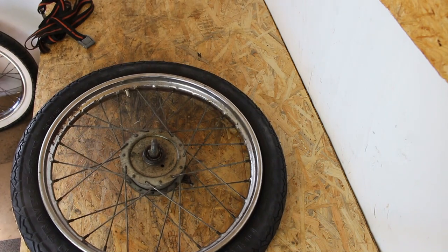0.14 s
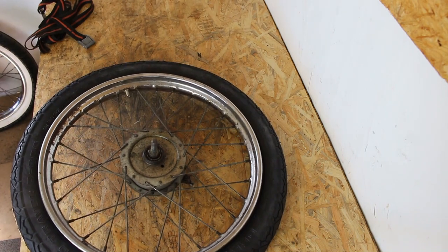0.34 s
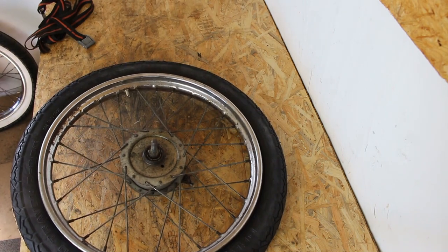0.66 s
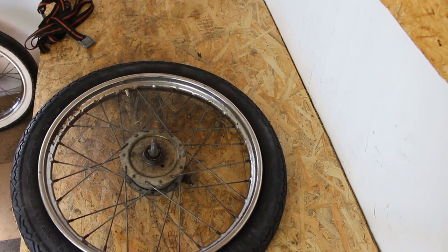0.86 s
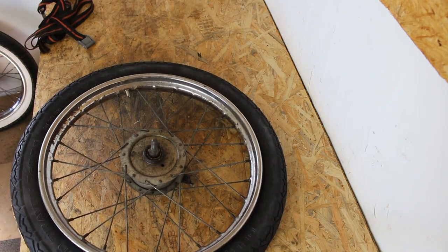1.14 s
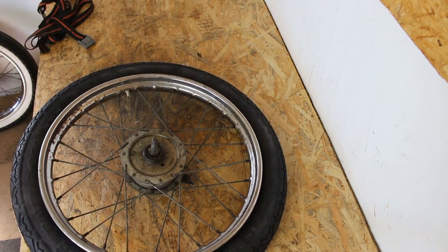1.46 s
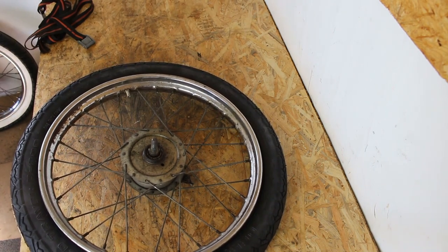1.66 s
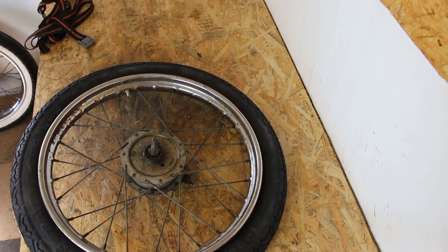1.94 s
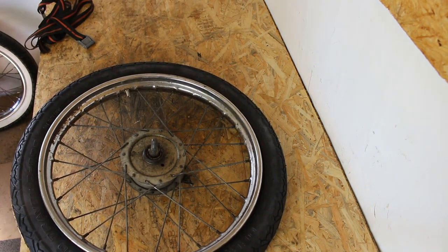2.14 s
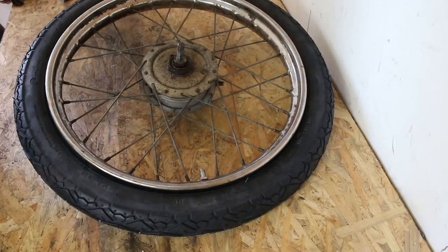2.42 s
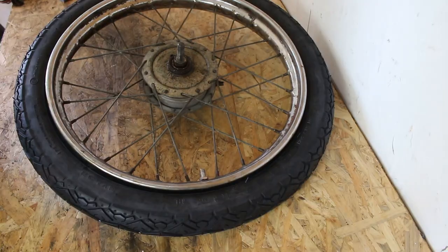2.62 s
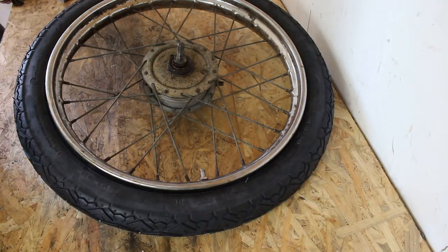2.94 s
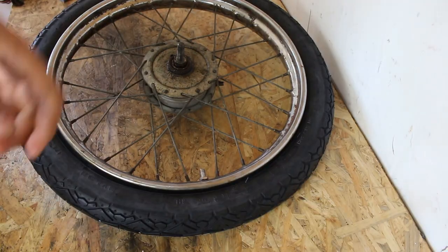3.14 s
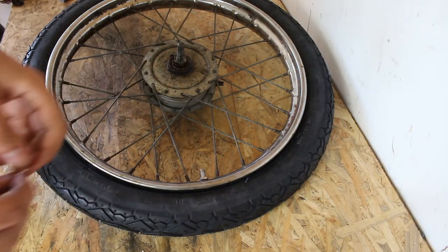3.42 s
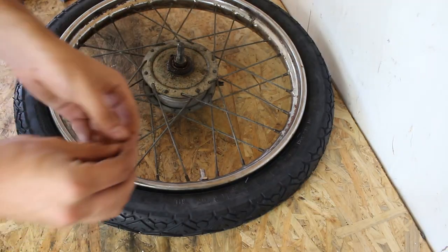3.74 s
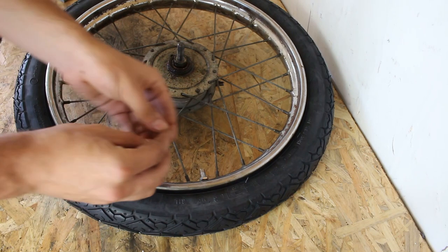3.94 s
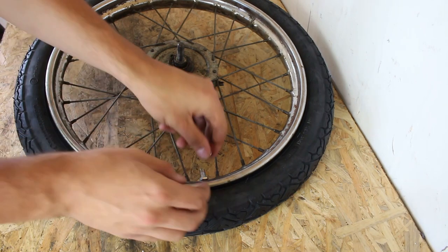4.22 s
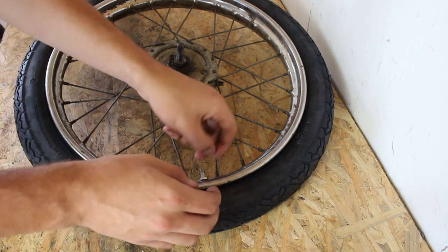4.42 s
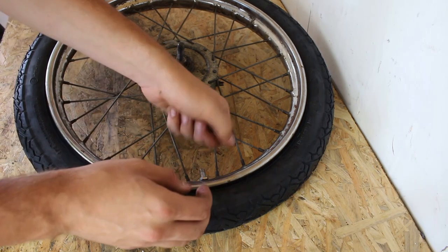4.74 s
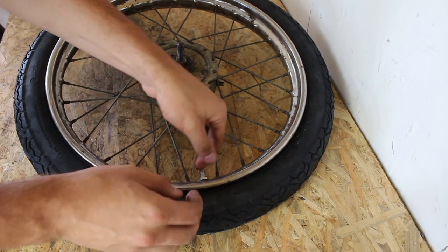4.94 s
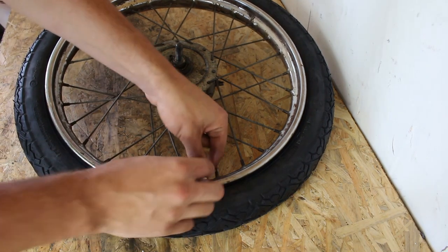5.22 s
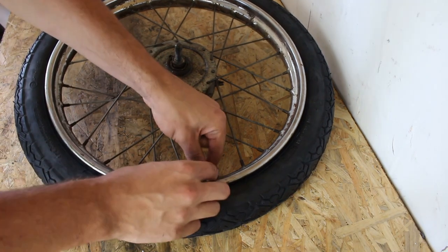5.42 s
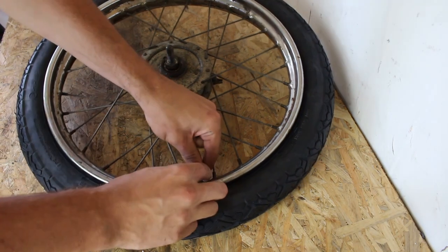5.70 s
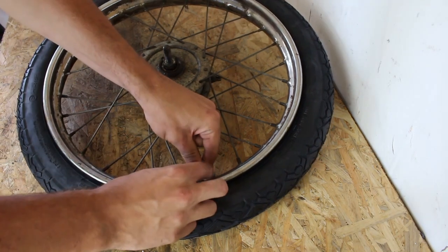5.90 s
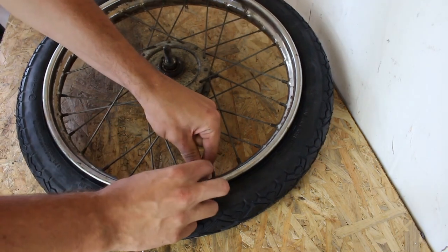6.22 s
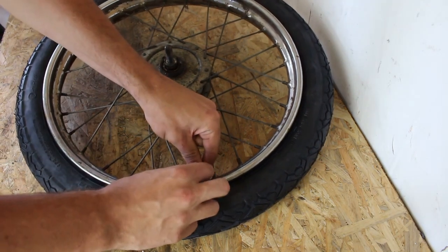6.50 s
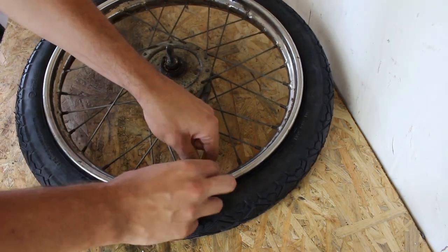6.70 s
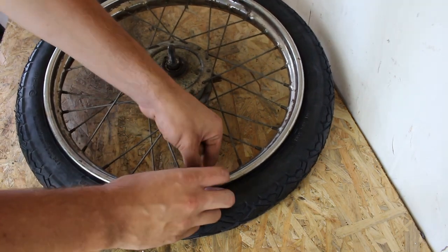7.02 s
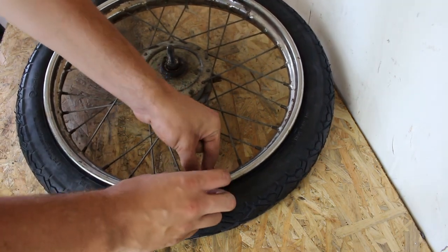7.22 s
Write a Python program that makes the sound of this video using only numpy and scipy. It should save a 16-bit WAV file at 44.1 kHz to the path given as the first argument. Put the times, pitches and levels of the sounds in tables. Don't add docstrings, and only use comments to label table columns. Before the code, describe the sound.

Loud bursts of clashing steel bars in a small workshop, followed by dull room knocks and faint handling of a wheel over soft hiss.

```python
import sys
import numpy as np
from scipy import signal
from scipy.fft import rfft, irfft, next_fast_len
from scipy.io import wavfile
from scipy.ndimage import uniform_filter1d

SR = 44100
rng = np.random.default_rng(int(sys.argv[2]) if len(sys.argv) > 2 else 0)


def put_to_file(sound):
    columns = np.atleast_2d(sound).T
    safe = np.clip(columns, -1, 1)
    whole_steps = np.round(safe * 32767)
    wavfile.write(sys.argv[1], SR, whole_steps.astype(np.int16))


def boost(x):
    u = np.asarray(x, float) / 20
    return 10 ** u


N = 324576


def read(table, hz):
    f, v = np.transpose(table)
    return np.interp(np.log(hz + 1), np.log(f), v)


def shape(x, gain):
    size = next_fast_len(x.shape[-1] + SR // 4)
    hz = np.arange(size // 2 + 1) * SR / size
    return irfft(rfft(x, size) * gain(hz), size)[..., :x.shape[-1]]


def below(hz, edge_hz, order):
    return 1 / (1 + (hz / edge_hz) ** order)


def above(hz, edge_hz, order):
    return 1 / (1 + (edge_hz / (hz + 1)) ** order)


def octave(hz, centre_hz):
    return np.clip(1 - abs(np.log2((hz + 1) / centre_hz)), 0, 1)


def fade(length, t60_s):
    return np.exp(-np.log(1000) * np.arange(length) / SR / np.clip(t60_s, .002, 3))


def ring(x, modes, longest_s=3.1):
    out = 0
    for hz, db, t60_s in modes:
        r = np.exp(-np.log(1000) / (np.clip(t60_s, .01, longest_s) * SR))
        w = 2 * np.pi * hz / SR
        out = out + boost(db) * signal.lfilter([np.sin(w)], [1, -2 * r * np.cos(w), r * r], x)
    return out


def lasting(rows, t60_s):
    return [(*row, t60_s) for row in rows]


def contacts(rows, grain_db, length=N, rise_s=0.0017):
    out = np.zeros(length + SR // 2)
    span = SR // 3
    rise = 1 - np.exp(-np.arange(span) / SR / rise_s)
    for s, db, t60_s in rows:
        unevenness = np.minimum(rng.exponential(size=span), 6)
        grains = rng.standard_normal(span) * boost(grain_db * unevenness)
        out[int(s * SR):][:span] += boost(db) * rise * fade(span, t60_s) * grains / grains.std()
    return out[:length]


def pings(rows, push_cycles):
    out = np.zeros(N + SR)
    t = np.arange(SR // 2) / SR
    for s, db, hz, t60_s in rows:
        build = 1 - np.exp(-t * hz / push_cycles)
        swing = np.sin(2 * np.pi * hz * t) * build * fade(len(t), t60_s)
        out[int(s * SR):][:len(t)] += boost(db) * swing / abs(swing).max()
    return out[:N]


def strike(blows, modes):
    return pings([(s, db + g, hz, t60_s) for s, db in blows for hz, g, t60_s in modes], 0.94)


def ports(three, alike):
    def likeness(hz):
        return np.clip(read(alike, hz), -1, 1)

    sides = []
    for k in range(2):
        shared = shape(three[0], lambda hz: np.sqrt(abs(likeness(hz))) * np.sign(likeness(hz)) ** k)
        own = shape(three[1 + k], lambda hz: np.sqrt(1 - abs(likeness(hz))))
        sides.append(shared + own)
    return np.array(sides)


# f/Hz, phase/rad
PORT_TURN = [(60, 0), (3000, .1), (5500, .4), (7500, 1.6), (9500, 2.3), (16000, 2.4)]


def direct_pair(x):
    return np.array([shape(x, lambda hz: np.exp(.5j * side * read(PORT_TURN, hz))) for side in (1, -1)])


# f/Hz, t60/s
ROOM_T60 = [(60, 0.35), (250, .35), (1000, 0.34), (3000, 0.29), (7000, 0.29), (15000, 0.18)]
# f/Hz, likeness/-1..1
PORT_ALIKE = [(60, .9), (130, .96), (450, .82), (1400, .5), (3100, .42), (6000, .2), (9000, -.4),
              (15000, -.6)]


def workshop(x, direct_db, build_s=0.0033):
    length, lead, tail = SR // 2, 256, 0
    noise = rng.standard_normal((3, length))
    for hz in 45.4 * 2. ** np.arange(9):
        band = shape(noise, lambda f: octave(f, hz))
        tail = tail + band * fade(length, read(ROOM_T60, hz))
    tail = tail * (1 - np.exp(-np.arange(length) / SR / build_s))
    tail = tail / np.sqrt(np.mean(np.sum(tail ** 2, axis=1)))
    response = ports(np.pad(tail, ((0, 0), (lead, 0))), PORT_ALIKE)
    click = boost(direct_db) * (np.arange(response.shape[1]) == lead)
    response = response + direct_pair(click)
    return signal.fftconvolve(x[None], response, axes=1)[:, lead:lead + len(x)]


def moving(x, direct_db, move_s, count=3):
    t = np.arange(len(x)) / SR
    out = 0
    for k in range(count):
        share = np.sqrt(2 / count) * np.cos(np.pi * (t / move_s + k / count))
        out = out + workshop(x * share, direct_db)
    return out


def diffuse(x, direct_db, build_s=0.002):
    def lag(power, r):
        return signal.lfilter([1 - r], [1, -r], power)

    noise, wash = rng.standard_normal((3, len(x))), 0
    for hz in 49.5 * 2. ** np.arange(9):
        power = shape(x, lambda f: octave(f, hz)) ** 2
        power = lag(power, np.exp(-1 / (build_s * SR)))
        power = lag(power, 10 ** (-6 / (read(ROOM_T60, hz) * SR)))
        band = shape(noise, lambda f: octave(f, hz))
        wash = wash + band / band.std() * np.sqrt(power)
    return ports(wash, PORT_ALIKE) + boost(direct_db) * direct_pair(x)


# f/Hz, density/dB per Hz
HISS = [(30, -14.5), (91, -3.5), (140, -7), (654, -11), (1430, -13.5), (4950, -20.5), (10000, -28),
        (15800, -38)]
# f/Hz, likeness/-1..1
HISS_ALIKE = [(60, 1), (130, -0.17), (290, -0.47), (640, -0.56), (1410, -0.51), (3100, -0.36), (6820, 0.43),
              (15000, 1)]


def hiss():
    air = ports(shape(rng.standard_normal((3, N)), lambda hz: boost(read(HISS, hz))), HISS_ALIKE)
    steps = np.repeat(rng.standard_normal(N // 4096 + 1), 4096)
    sway_db = .5 * uniform_filter1d(steps, 4096)[:N]
    return air * boost(-58.6 + sway_db) / air.mean(axis=0).std()


# f/Hz, density/dB per Hz
WOOD = [(120, -35), (232, -1), (290, -6.5), (647, -3), (2170, -5), (3190, -5), (8740, -24), (16000, -44)]


def wood(rows, rise_s):
    split_hz, top_hz = 2700, 7500
    s, db, treble_db, t60_s = np.transpose(rows)

    def part(level_db, grain_db, band):
        burst = contacts(zip(s, level_db, t60_s), grain_db, rise_s=rise_s)
        return shape(burst, lambda hz: boost(read(WOOD, hz)) * band(hz))

    body = part(db, 3.8, lambda hz: below(hz, split_hz, 4))
    hard = part(db + treble_db + 6.5, 1.9, lambda hz: below(hz, top_hz, 4) - below(hz, split_hz, 4))
    top = part(db + 2.07 * treble_db + 14.5, 2.2, lambda hz: 1 - below(hz, top_hz, 4))
    return body + hard + top


# t/s, peak level/dB, treble/dB, contact t60/s
KNOCKS = [(0.01, -4.5, -1, 0.041), (2.026, -34.5, -7, 0.098), (2.066, -22, -36, 0.047),
          (2.158, -22.5, -22, 0.063), (2.21, -34.5, -8, 0.097), (2.238, -24, -5, 0.077),
          (2.357, -12.5, -1, 0.033), (2.372, -19, -5.5, 0.097), (3.034, -13, -9, 0.068),
          (3.059, -13, -8.5, 0.052), (3.11, -28.5, -7.5, 0.053), (3.128, -14.5, -3.5, 0.024),
          (3.276, -10.5, -2.5, 0.038), (3.294, -5.5, -5.5, 0.029), (3.537, -26.5, -27, 0.027),
          (3.559, -18.5, -12.5, 0.057), (3.6, -21.5, -9.5, 0.064), (3.622, -22.5, -9.5, 0.061),
          (3.729, -17.5, -8.5, 0.094), (3.745, -19, -9, 0.046), (3.77, -23.5, -12, 0.04)]


def knocks():
    length = int(4.4 * SR)
    dry_knocks = boost(12.0) * wood(KNOCKS, rise_s=0.0012)[:length]
    return np.pad(diffuse(dry_knocks, -6), ((0, 0), (0, N - length)))


# f/Hz, level/dB, t60/s
DROP = [(738, -5.5, 0.16), (1153, -7.5, 0.11), (1330, 4.5, 0.018), (1817, -1.5, 0.074), (2320, 1, 0.025),
        (3961, -14, 0.086), (7424, -22.5, 0.4), (9340, -16, 0.1)]


def tool_drop():
    return strike([(.0108, -13)], DROP)


# t/s, peak level/dB, rattle t60/s
CLASH_0 = [
    (0.0138, -4.5, 0.029),
    (.05, -21.5, 0.28),
]
CLASH_A = [
    (0.229, -11, 0.088),
    (0.2456, -6, 0.048),
    (0.2999, -14.5, 0.075),
]
CLASH_B = [(0.361, -5.5, 0.069), (0.366, 4.5, 0.022), (0.3807, -11, 0.029), (0.4284, -4.5, 0.042),
           (0.456, -4, 0.032), (0.5013, -23, 0.29), (.555, -16, 0.17), (0.5719, -11, 0.085),
           (0.5874, -11, 0.089), (.62, -18.5, 0.036), (0.6493, -7.5, 0.041)]
CLASH_C = [
    (0.862, -28.5, 0.089),
    (0.878, -12.5, 0.042),
    (0.8895, -6, 0.059),
    (0.92, -8, 0.057),
    (.945, -15.5, 0.083),
    (0.968, -17, 0.11),
    (1.02, -18.5, 0.13),
    (1.095, -19.5, 0.065),
]
# f/Hz, level/dB, t60/s
LEVER_0 = [(4020, -12, .25), (4680, -17, .2), (5750, -14, .1), (6320, -15, .25), (7420, -13, .3),
           (9240, -21, .1), (11100, -27, .2), (11700, -34, .15)]
LEVER_A = [(3290, -9, .12), (3700, -7, .27), (4060, -10, .2), (4530, -4, .27), (4800, -9, .2),
           (5270, -10, .27), (6150, -6, .15), (6300, -6, .15), (7500, -12, .15), (7890, -13, .15),
           (8900, -17, .1), (10330, -23, .2), (11100, -26, .15), (12000, -35, .2), (8500, -20, .1),
           (9300, -17, .1), (10000, -27, .1), (10650, -26, .1), (11750, -30, .12), (12500, -36, .2)]
LEVER_B = [(2295, -16, .2), (3145, -5, .22), (4062, -1, .22), (5061, -10, .15), (5122, -4, .18),
           (5177, -2, .2), (6270, -6, .2), (6340, -4, .25), (6440, -8, .2), (7340, -11, .25),
           (7550, -7, .15), (8655, -13, .2), (8900, -14, .2), (9300, -19, .15)]
LEVER_C = [(2310, -17, .27), (2990, -10, .27), (3141, -2, .22), (4075, -4, .34), (4118, -2, .3),
           (5205, -3, .3), (6165, -8, .25), (6445, -8, .25), (7200, -11, .27), (7345, -9, .25),
           (7545, -10, .25), (8655, -13, .27), (8845, -12, .27), (9250, -21, .2)]
# f/Hz, level/dB, t60/s
LEVER_TOP = [(9680, -33, .27), (10100, -20, .25), (10300, -19, .2), (10700, -19, .2), (11600, -23, .27),
             (11820, -22, .27), (12560, -29, .27), (13150, -36, .27), (13410, -35, .27), (13825, -34, .27),
             (14300, -40, .27), (14824, -37, .27), (15082, -35, .27)]
CRUNCH_DB = (-2.3, 1, 0, 2)
# t/s, peak level/dB
LANDINGS = [
    (0.245, -38),
    (0.367, -50),
    (0.424, -11.5),
    (0.562, -12.5),
    (0.89, -9),
    (0.919, -36),
    (1.099, -26),
]
# f/Hz, level/dB, t60/s
BAR_LOW = [(635, -3, .3), (860, -8, .15), (960, -5, .25), (1570, -5, .45), (1810, -8, .5), (2300, -5, .45)]


def levers():
    length = int(2.2 * SR)
    pushes = [contacts(rows, 2.8, length, rise_s=0.0043) for rows in (CLASH_0, CLASH_A, CLASH_B, CLASH_C)]
    held = (LEVER_0, LEVER_A, LEVER_B + LEVER_TOP, LEVER_C + LEVER_TOP)
    ring_db = (-23.5, -30.0, -33, -29.5)

    landing = contacts(lasting(LANDINGS, 0.048), 3.0, length, rise_s=0.00083)
    thud = shape(landing, lambda hz: above(hz, 300, 2) * below(hz, 2000, 6))
    crunch = sum(boost(db) * push for db, push in zip(CRUNCH_DB, pushes))
    crunch = shape(crunch, lambda hz: above(hz, 2900, 4))
    low = boost(6.0) * crunch + boost(8) * thud + boost(-34.5) * ring(landing, BAR_LOW)

    high = 0
    valley_db, half_width_hz = -22.5, 220
    for push, modes, db in zip(pushes, held, ring_db):
        sisters = [(hz * (1 + .011 * rng.standard_normal()), g - 4, .5 * t60_s) for hz, g, t60_s in list(modes) * 2]
        cluster = list(modes) + sisters
        low = low + boost(db) * ring(push, [m for m in cluster if m[0] < 8000])
        tops_hz = [m[0] for m in modes if m[0] >= 8000]
        treble = ring(push, [m for m in cluster if m[0] >= 8000])

        def near(f):
            return boost(valley_db) + np.max([1 / (1 + ((f - hz) / half_width_hz) ** 4) for hz in tops_hz], axis=0)

        high = high + boost(db + 10.5) * shape(treble, near)
    low = shape(low, lambda hz: below(hz, 7750, 24))
    high = shape(high, lambda hz: above(hz, 8350, 30))
    return np.pad(moving(low + high, -1.5, move_s=.3), ((0, 0), (0, N - length)))


# t/s, level/dB, rumble/dB
SHOVE = [
    (0.029, -22.5, -13),
    (0.2, -37.5, -5.5),
    (0.606, -39.5, 5.5),
    (0.86, -37.5, -15),
    (0.906, -39.5, 9),
    (1.012, -33.5, -9),
    (1.171, -49.5, 9.5),
    (1.3, -87, -21),
]
# peak t/s, level/dB, swell/s, stop/s, treble/dB
SLIDES = [
    (1.5, -51, 0.39, 0.12, -1),
    (1.635, -39.5, 0.14, 0.041, -10),
    (1.98, -60.5, 0.354, 0.057, -1),
    (2.471, -17, 0.012, 0.0039, -15),
    (2.656, -49.5, 0.44, 0.005, -2),
    (6.08, -57, 0.35, 0.21, -14),
    (6.87, -65, 1, 0.27, -5),
]


def drags():
    t, out = np.arange(N) / SR, 0
    swell_db = 23.5
    unevenness = np.minimum(rng.exponential(size=N), 5)
    grains = rng.standard_normal((3, N)) * boost(3.1 * unevenness)
    body = shape(grains[0], lambda hz: above(hz, 450, 4) * below(hz, 1800, 4))
    treble = shape(grains[1], lambda hz: above(hz, 2500, 4) * below(hz, 6500, 6))
    rumble = shape(grains[2], lambda hz: above(hz, 55, 4) * below(hz, 300, 4)
                   * (1 + 1.8 / (1 + ((hz - 228) / 30) ** 2)))
    body, treble, rumble = body / body.std(), treble / treble.std(), rumble / rumble.std()

    def rub(treble_db, rumble_db):
        return body + boost(treble_db) * treble + boost(rumble_db) * rumble

    for s, db, swell_s, stop_s, treble_db in SLIDES:
        distance = np.where(t < s, (s - t) / swell_s, (t - s) / stop_s)
        out = out + boost(db - swell_db * distance) * rub(treble_db, -15)
    s, db, rumble_db = np.transpose(SHOVE)
    active = (t > s[0]) * (t < s[-1])
    return out + boost(np.interp(t, s, db)) * active * rub(-7, np.interp(t, s, rumble_db))


# t/s, peak level/dB, f/Hz
HEAVY_THUMPS = [(0.101, -22.5, 217), (0.428, -24.5, 299), (0.569, -21.5, 247), (0.9, -24, 329),
                (0.929, -29, 276), (1.047, -42, 65), (1.165, -39.5, 260), (1.838, -54, 162.5),
                (2.02, -26.5, 229), (2.062, -22.5, 204), (2.098, -24, 233), (2.151, -16, 204),
                (2.165, -23.5, 220), (2.186, -31, 235), (2.24, -37, 220), (2.354, -24, 211),
                (3.035, -26.5, 192.3), (3.209, -38, 153), (3.275, -23, 156), (3.538, -30, 220),
                (3.563, -27, 217), (3.607, -23, 204), (3.732, -23, 212.6), (3.758, -24, 205)]
# t/s, peak level/dB, f/Hz
HAND_THUMPS = [(4.403, -53, 189.6), (4.95, -59.5, 172), (5.079, -31.5, 183), (5.086, -38, 98),
               (5.325, -43, 167), (5.38, -44, 77.4), (5.629, -49, 160), (5.76, -41.5, 112),
               (5.831, -38, 151.5), (5.976, -32, 102), (6.057, -40.5, 183), (6.198, -38.5, 104),
               (6.257, -34, 123), (6.3, -46, 119), (6.41, -41, 105), (6.447, -34.5, 118), (6.483, -35, 105),
               (6.544, -33.5, 110), (6.623, -41, 150), (6.726, -38.5, 123), (6.809, -44.5, 401),
               (6.911, -45.5, 109), (6.97, -47, 163), (7, -47, 73.3), (7.101, -50.5, 126.7),
               (7.197, -51.5, 122.7)]
# f/Hz, width/Hz, level/dB
BENCH = [(81.6, 26.4, 10), (105, 41, 3), (150, 27, 2), (204, 50.6, 8), (309.6, 27.5, 7), (367, 33, -2),
         (489, 28, 3.5), (597, 62, -10)]


def bench():
    thumps = lasting(HEAVY_THUMPS, 0.11) + lasting(HAND_THUMPS, 0.16)
    s, db, _, t60_s = np.transpose(thumps)
    push = contacts(zip(s, db, 0.87 * t60_s), 2.5, rise_s=0.003)
    rumble = ring(push, [(hz, g, 0.92 / width_hz) for hz, width_hz, g in BENCH])
    rumble = shape(rumble, lambda hz: above(hz, 75, 4) * below(hz, 420, 2))
    return pings(thumps, 0.87), boost(-37.0) * rumble


# t/s, level/dB
FREE_BLOWS = [
    (0.379, -32),
    (.9, -27),
    (1.019, -35),
    (1.109, -27.5),
    (1.169, -42),
]
# f/Hz, level/dB, t60/s
LEVER_FREE = [(3119, -5, 1.2), (3601, -24, .9), (4722, -22, .9), (5082, -12, .35), (7203, -13, 1.0),
              (8886, -15, .6), (11443, -19, 1.3)]


def free_lever():
    blows = np.zeros(3 * SR)
    for s, db in FREE_BLOWS:
        blows[int(s * SR)] = boost(db - 9)
    return np.pad(workshop(ring(blows, LEVER_FREE), 9), ((0, 0), (0, N - 3 * SR)))


# t/s, peak level/dB, f/Hz
TICKS = [
    (2.484, -26.5, 2620),
    (2.500, -30.5, 1230),
    (2.51, -34, 1140),
    (2.661, -20.5, 1660),
    (2.668, -21.5, 1326),
    (4.036, -38, 2080),
]


def ticks():
    crackle = contacts([(s, db + 4.5, .015) for s, db, _ in TICKS], 3.7, rise_s=0.001)
    crackle = shape(crackle, lambda hz: above(hz, 900, 4) * below(hz, 4500, 4))
    return crackle + pings(lasting(TICKS, .009), 0.14)


# t/s, level/dB
SPOKE_TICK = (4.41, -46)
SPOKE_PLUCK = (5.09, -50)
# f/Hz, level/dB, t60/s
SPOKES = [(786, -3, 0.7), (1696, -14, .4), (2083, -14, .4), (2293, -9, 0.45), (3031, -11, .4),
          (4183, -9, 0.33)]


def spokes():
    damped = [(hz, db, .5 * t60_s) for hz, db, t60_s in SPOKES[1:-1]]
    return strike([SPOKE_TICK], damped) + strike([SPOKE_PLUCK], SPOKES)


# t/s, peak level/dB, treble/dB, contact t60/s
TAPS = [(4.414, -44.5, -6, 0.081), (5.08, -33, -17, 0.033), (5.824, -33.5, -6.5, 0.058),
        (5.995, -47, 4.5, 0.039), (6.056, -39, 3.5, 0.074), (6.074, -30, -10, 0.046),
        (6.207, -41.5, -1, 0.029), (6.258, -28.5, 7, 0.03), (6.272, -33, -18, 0.035), (6.445, -41, 2, 0.03),
        (6.543, -26, -1.5, 0.027), (6.558, -28, -13, 0.021), (6.775, -47, -0.5, 0.19),
        (6.859, -62, 8.5, 0.14)]


def taps():
    return boost(5.5) * wood(TAPS, rise_s=0.0024)


# t/s, peak level/dB, f/Hz
KNUCKLES = [(5.338, -51.5, 385), (5.823, -41, 477), (5.826, -46, 1270), (5.859, -44, 594), (6.06, -38, 387),
            (6.084, -39, 630), (6.258, -31, 375), (6.264, -33.5, 561), (6.542, -33, 506), (6.579, -49, 455),
            (7.231, -52.5, 367)]


def knuckles():
    return pings(lasting(KNUCKLES, 0.094), 0.07)


# t/s, level/dB, contact t60/s
NIPPLE_PLUCKS = [
    (5.46, -74, 0.067),
    (5.5, -64, 0.065),
]
RIM_PLUCKS = [
    (5.825, -86, 0.029),
    (6.543, -48, 0.064),
]
VALVE_PLUCKS = [
    (6.075, -60, 0.016),
    (6.261, -56, 0.027),
]
CAP_RUBS = [
    (6.85, -66.5, 0.18),
]
# f/Hz, level/dB, t60/s
NIPPLE = [(1504, -9, 0.3), (5880, -4, 0.043), (6000, -6, 0.044), (7860, 1, 0.05)]
RIM = [(1783, 3, 0.046), (2080, -2, 0.057), (2760, 4.5, 0.021), (2950, 1, 0.031), (3390, -3, 0.038),
       (4323, -28, 0.2)]
VALVE = [(2800, -23, 0.45), (4200, 10, 0.07), (5540, 12, 0.044), (6300, -8.5, 0.46), (6850, -14, 0.13),
         (7940, -4, 0.072), (7741, -22, 0.33), (8800, -17, 0.22)]
CAP = [(5800, -3, 0.033), (6100, 0, 0.03), (7850, -2, 0.028)]


def rim():
    parts = ((NIPPLE_PLUCKS, NIPPLE, .3), (RIM_PLUCKS, RIM, .14), (VALVE_PLUCKS, VALVE, .2), (CAP_RUBS, CAP, .2))
    return boost(-11.5) * sum(ring(contacts(plucks, 1.6), modes, longest_s) for plucks, modes, longest_s in parts)


def scene():
    t = np.arange(N) / SR
    start_s, cut_s = .0105, 2.462
    swing, rumble = bench()
    solid = tool_drop() + boost(-4.5) * swing + spokes() + knuckles()
    far = knocks() * ((t < cut_s) | (t > 3)) + boost(-4) * levers()
    near = workshop(boost(-4.5) * drags() + rumble + taps() + rim() + boost(-14.0) * solid, 2.1)
    chop = np.interp(t - cut_s, [0, .001, .11, .15], [1, .1, .1, 1])
    mix = (far + near + solid + free_lever()) * chop + ticks() + hiss()
    return mix * np.where(t > start_s, 1, boost(-15))


def low_pass(x):
    return signal.sosfilt(signal.butter(12, 16520, fs=SR, output="sos"), x)


def record(dry):
    bass_cut = signal.butter(4, 46, "high", fs=SR, output="sos")
    top_cut = signal.ellip(10, .2, 80, 15850, fs=SR, output="sos")
    clipped = np.clip(signal.sosfilt(bass_cut, dry), -1, 1)
    return low_pass(signal.sosfilt(top_cut, clipped))


dry = scene()
out = record(dry)
put_to_file(out)
```